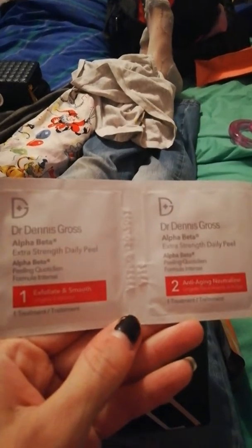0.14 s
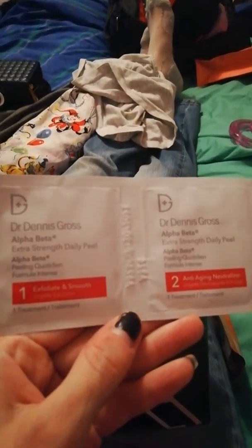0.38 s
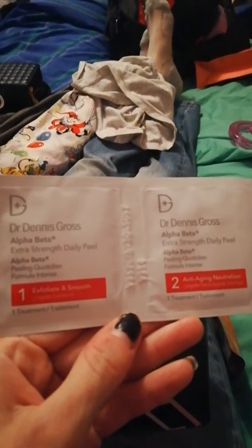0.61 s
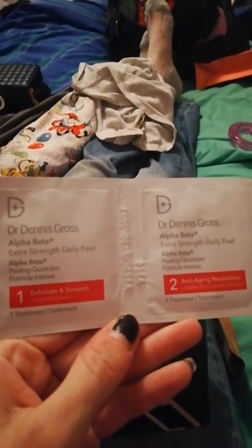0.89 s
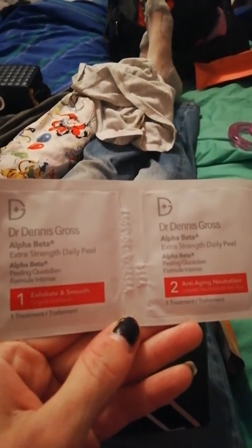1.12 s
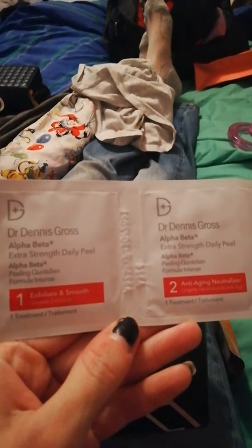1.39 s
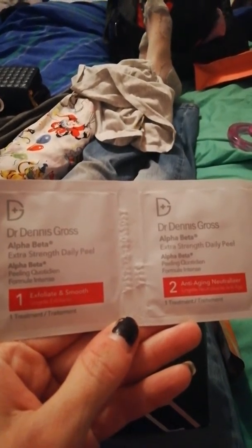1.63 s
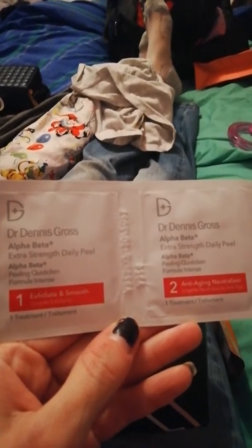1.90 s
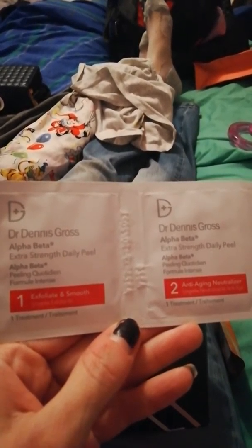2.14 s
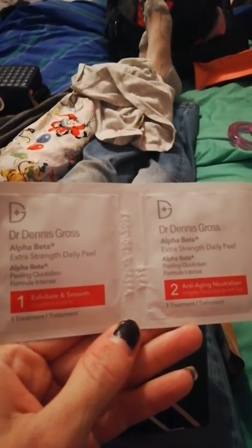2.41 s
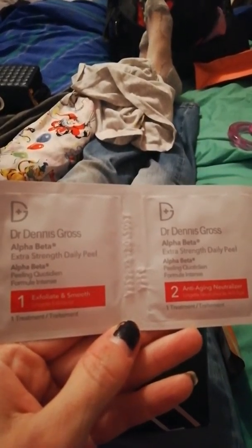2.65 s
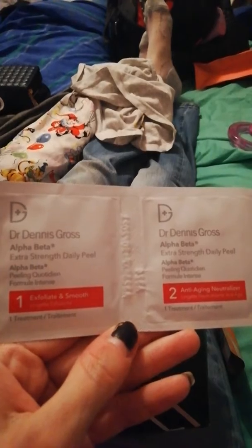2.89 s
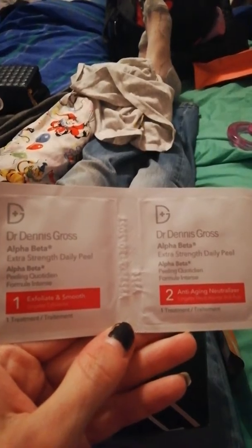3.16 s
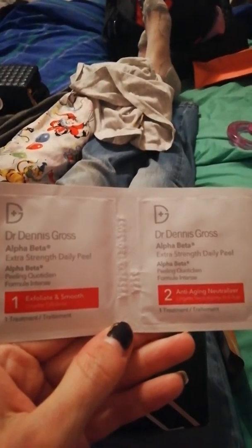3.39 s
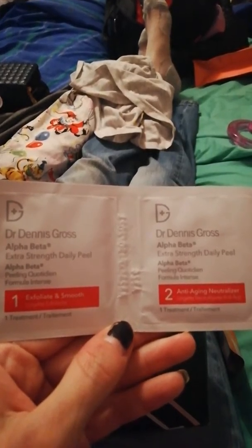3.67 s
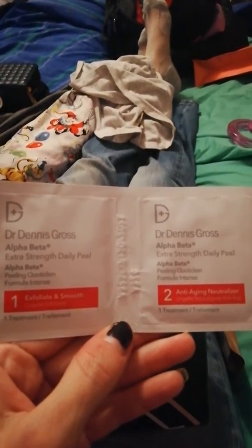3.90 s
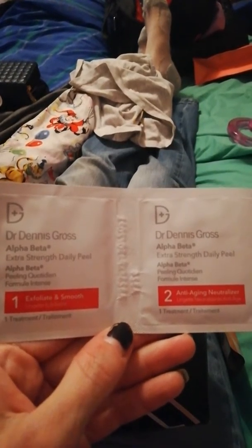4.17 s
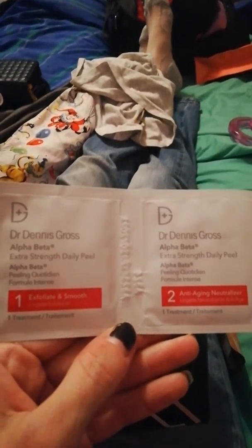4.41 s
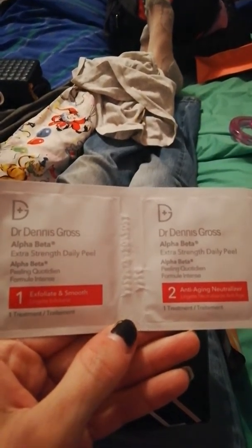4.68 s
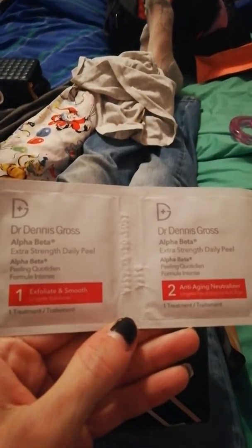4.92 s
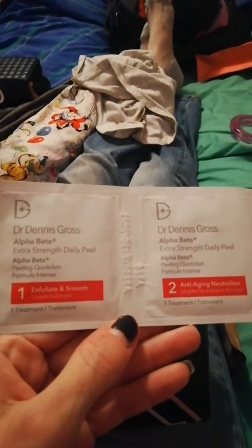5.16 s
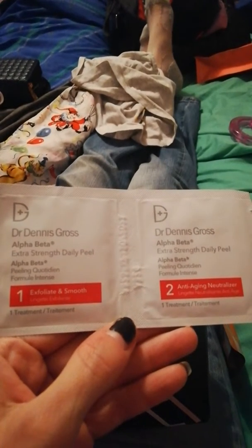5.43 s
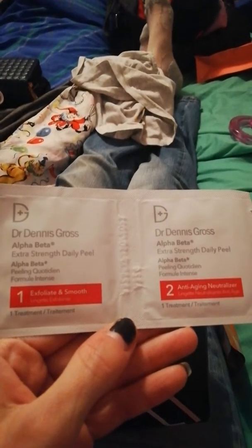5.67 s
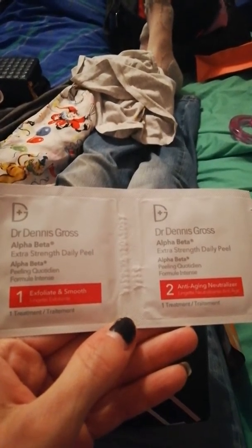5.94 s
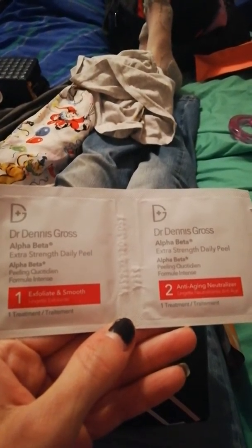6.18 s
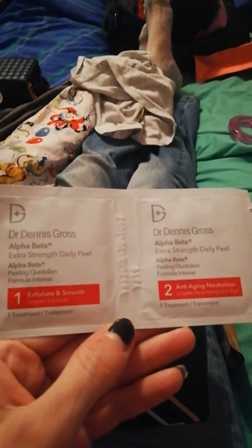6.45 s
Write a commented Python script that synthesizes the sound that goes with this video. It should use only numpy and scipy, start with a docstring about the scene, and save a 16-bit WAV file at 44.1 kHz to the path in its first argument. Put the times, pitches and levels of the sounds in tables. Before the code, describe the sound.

A small foil-laminate sachet is flexed between finger and thumb, very close to a phone microphone in a soft, quiet bedroom. A dense crumple with rapid snaps opens it, then scattered crisp crackles and faint rustles, a sharp pop near 1.4 seconds, more around 3, a long quiet gap, and last snaps just after 5 seconds.

```python
"""In a soft, quiet bedroom, a foil sachet is flexed between finger and thumb, a hand's width from a phone.
Creases snap: a noise crack, damped panel and pouch modes, and a faint settling of the film.
Fingers slide and crumple the film in bouts of grainy, resonated noise, and a short diffuse tail follows.
Soft grip swells and steady coloured room noise lie below. Two sound inlets hear it with a lag
and their own resonances."""
import sys
import numpy as np
from scipy import signal
from scipy.fft import rfft, irfft
from scipy.io import wavfile
from scipy.ndimage import uniform_filter1d

SR = 44100
rng = np.random.default_rng(int(sys.argv[2]) if len(sys.argv) > 2 else 0)


def attenuation_scalar(level_db):
    """Turn a level in dB into a linear amplitude multiplier (20 dB per decade)."""
    decades = np.asarray(level_db, float) / 20
    return 10 ** decades


def wav_out(sig):
    """Save sig, one row per channel (or a flat mono array), as 16-bit PCM at SR to the path in sys.argv[1]."""
    wavfile.write(sys.argv[1], SR, np.round(np.clip(np.atleast_2d(sig).T, -1, 1) * 32767).astype(np.int16))


N = 289359  # length [samples]
PORT_LAG = 27  # travel from the left inlet to the right one [samples]


def band(x, hz, width):
    """Two-pole resonance, gain 1 at the centre."""
    return signal.lfilter(*signal.iirpeak(min(hz, 0.45 * SR), hz / width, fs=SR), x)


def level(x, db):
    """Scale to an rms level, taken over both ports together."""
    return x * attenuation_scalar(db) / np.sqrt(np.mean(x ** 2))


def peak(x, db):
    """Scale a burst so that the top of its envelope lies at db in each port."""
    envelope_power = 2 * uniform_filter1d(x ** 2, size=50)
    return x * attenuation_scalar(db) / np.sqrt(envelope_power.max(axis=1, keepdims=True))


def walk(rate):
    """Random levels held 1 / rate s and slewed twice; spread near 1."""
    hold = int(SR / rate)
    steps = np.repeat(rng.standard_normal(N // hold + 1), hold)
    return 1.3 * uniform_filter1d(uniform_filter1d(steps, hold), hold)[:N]


def ring(modes, t, chance, rise_s, scatter_db, detune):
    """Damped modes after a short push; every blow and each port get other strengths and phases."""
    hz, db, t60 = modes.T[:, :, None]
    hz = np.minimum(hz * (1 + detune * chance[0, 0]), 0.4 * SR)
    gain = attenuation_scalar(db + scatter_db * (chance[0, 1] + chance[:, 2]) / 2)
    phase = chance[0, 3] + chance[:, 4] * np.minimum(hz / 1500, 2)  # low modes move both ports alike
    decay = np.exp(-np.log(1000) * t / t60)
    waves = gain * decay * np.sin(2 * np.pi * hz * t + phase)
    push = 1 - np.exp(-(t / rise_s) ** 2)
    return waves.sum(axis=1) * push


# creases that snap:
# (time [s], panel pitch [Hz], panel level [dB], pouch level [dB], crack level [dB])
CREASES = [(0.1355, 2580, -38.5, -35, -33), (0.1464, 3480, -26, -27.5, -23.5),
           (0.1526, 3150, -34, -27.5, -47), (0.1598, 2990, -13.5, -25.5, -24.5),
           (0.1833, 880, -37, -32, -49), (0.194, 890, -55, -36, -47), (0.427, 1810, -57, -43, -49),
           (0.4773, 2775, -16.5, -33, -27.5), (0.5681, 3630, -43.5, -48, -47),
           (0.6362, 2780, -23.5, -37.5, -57), (0.648, 1060, -49, -46, -61), (0.6729, 885, -35, -35, -59),
           (0.6769, 1290, -39, -44, -62), (0.703, 1090, -49, -37, -55), (0.8157, 3160, -36, -59, -42),
           (0.8196, 900, -52, -33.5, -42), (0.86, 3500, -22, -45, -27.5), (0.864, 940, -26, -33, -33),
           (0.984, 2830, -31.5, -35, -28), (0.9874, 970, -54, -36, -36), (1.0078, 980, -29, -25.5, -55),
           (1.0288, 1010, -45, -45, -61), (1.0995, 1010, -27, -32.5, -58), (1.151, 840, -47, -38.5, -70),
           (1.3043, 2460, -50, -43.5, -38), (1.3365, 2940, -47.5, -50, -51), (1.344, 3270, -49, -58, -46),
           (1.3739, 2410, -45, -55, -43), (1.3941, 2200, -26, -57, -45), (1.3942, 2300, -22, -24.5, -51),
           (1.4314, 2830, -10, -40, -15), (1.4402, 2990, -55.5, -47.5, -36), (1.4744, 915, -26, -31.5, -39),
           (1.5078, 890, -62, -42.5, -64), (1.5636, 840, -27.5, -41, -64),
           (1.6205, 1140, -31.5, -31.5, -50), (1.7641, 2210, -41.5, -49, -40),
           (1.9309, 3060, -42, -55, -50), (2.8037, 3970, -49, -50, -54), (2.9187, 1020, -14, -42, -26.5),
           (2.9235, 3070, -17, -24.5, -33.5), (2.9888, 1190, -25.5, -27, -48),
           (2.9934, 1220, -25, -34.5, -54), (3.065, 1100, -36, -35.5, -46),
           (3.177, 2160, -15, -29.5, -20.5), (3.187, 2260, -40, -41.5, -36), (3.7769, 4030, -54, -61, -49),
           (3.8243, 2364, -53.5, -69, -59), (4.7572, 940, -35, -44, -63), (4.7767, 1100, -48, -51, -61),
           (4.8256, 3900, -33, -42, -32.5), (4.847, 1060, -39.5, -45.5, -56),
           (4.8827, 1800, -48, -32.5, -60), (4.8875, 1270, -43.5, -49, -53), (4.9478, 3620, -46, -57, -46),
           (4.9778, 880, -65, -47.5, -69), (5.2141, 920, -35, -52, -51), (5.2194, 1170, -19, -33.5, -27),
           (5.2306, 890, -33, -60, -44), (5.283, 3300, -11, -27, -13), (5.294, 3300, -45, -50, -42.5)]
# modes of the panel beside the crease: (multiple of its pitch [ratio], level [dB], t60 [s])
PANEL_MODES = [(.45, -17, 0.013), (.72, 1, 0.0045), (1.002, 0, 0.0079), (1.28, -1, 0.0051),
               (1.6, -4.0, 0.0028), (2.1, -6.5, 0.0064), (2.8, -5, 0.0052), (3.7, -9.5, 0.0074)]
# modes of the air-filled pouch, before detuning: (pitch [Hz], level [dB], t60 [s])
POUCH_MODES = [(196, -14, 0.031), (267, -17.5, .04), (340, -5, 0.024), (451.2, -5, 0.03),
               (561.4, -0.5, 0.024), (720, 0.5, 0.015), (861, -2.5, 0.028), (1149, -6, 0.022)]
# where along the sachet the creases flip: (time [s], left minus right [dB])
CREASE_PAN = [(0.15, -3), (0.5, 0), (0.86, 1.5), (1.05, 4), (1.39, 0.5), (1.43, 4.5), (1.48, -0.5),
              (2.9, 5.5), (3.0, 4.5), (3.18, 6.5), (4.76, 8), (4.83, 4.5), (5.21, 3), (5.28, -4.5)]


def snaps():
    """Each crease flips: a broad crack, the panel rings briefly, the pouch thuds longer."""
    out, t = np.zeros((2, N + 4096)), np.arange(2600) / SR
    chances = rng.standard_normal((len(CREASES), 2, 2, 5, len(PANEL_MODES), 1))
    noises = rng.standard_normal((len(CREASES), 2, 2600))
    damped = signal.butter(4, 4600, fs=SR, output="sos")  # the laminate swallows the panel's higher modes
    for (s, hz, panel_db, pouch_db, crack_db), chance, noise in zip(CREASES, chances, noises):
        panel = ring(np.array(PANEL_MODES) * [hz, 1, 1], t, chance[0],
                     rise_s=0.00028, scatter_db=1.0, detune=0.054)
        panel = signal.sosfilt(damped, panel)
        pouch = ring(np.array(POUCH_MODES), t, chance[1], rise_s=0.001, scatter_db=2.0, detune=0.087)

        # the higher the panel's pitch, the brighter its crack
        bright = signal.butter(3, [4200, 8500 + hz], "band", fs=SR, output="sos")
        click = t / 0.0005 * np.exp(-t / 0.00037)
        crackle = 0.02 * np.exp(-t / 0.0026)
        crack = signal.sosfilt(bright, noise * (click + crackle))

        # the film settles for some hundredths of a second, trembling around the panel's pitch
        settle_shape = np.exp(-t / 0.018) * (1 - np.exp(-(t / 0.0013) ** 2))
        settle = band(noise[:, ::-1], hz, 2.8 * hz) * settle_shape

        blow = peak(panel, panel_db) + peak(settle, panel_db - 28)
        blow = blow + peak(pouch, pouch_db) + peak(crack, crack_db)
        pan_db = np.interp(s, *np.transpose(CREASE_PAN))
        for port, sign in enumerate((1, -1)):
            start = int(s * SR) + PORT_LAG * port  # the right port is the far one
            out[port, start:start + len(t)] += blow[port] * attenuation_scalar(sign * pan_db / 2)
    # so small a pouch radiates no bass
    return signal.sosfilt(signal.butter(2, 170, "high", fs=SR, output="sos"), out[:, :N])


# finger strokes over the film:
# (start [s], hold [s], slide hiss level [dB], film rustle level [dB], pouch crumple level [dB])
FINGER_STROKES = [(-0.03, 0.018, -56, -48.5, -38), (0.026, 0.016, -50, -44, -43.5),
                  (0.056, 0.029, -54, -47, -42.5), (0.123, 0.044, -48.5, -46, -42),
                  (0.2, 0.028, -58.5, -67, -59.5), (0.426, 0.046, -52.5, -61, -69.5),
                  (0.487, 0.069, -61.5, -65, -68), (0.573, 0.14, -61.5, -66, -68.5),
                  (0.781, 0.066, -54, -54.5, -57), (0.986, 0.0064, -55.5, -50, -50),
                  (1.002, 0.022, -65.5, -65, -60.5), (1.077, 0.046, -63, -66, -66),
                  (1.145, 0.079, -58, -63.5, -67.5), (1.373, 0.094, -55, -55, -62),
                  (1.504, 0.097, -54, -66.5, -72), (1.625, 0.065, -58, -54, -57),
                  (1.717, 0.036, -54, -54, -56), (1.801, 0.13, -70.5, -68, -79.5),
                  (2.137, 0.011, -68, -71.5, -81.5), (2.704, 0.11, -72, -66.5, -87),
                  (2.78, 0.11, -53.5, -56, -71), (2.915, 0.064, -58.5, -62.5, -84.5),
                  (3.017, 0.1, -53, -58.5, -66.5), (3.126, 0.072, -56, -57.5, -65.5),
                  (4.573, 0.06, -71.5, -71, -82), (4.678, 0.1, -54, -65, -70),
                  (4.78, 0.077, -60.5, -56.5, -71), (4.912, 0.021, -56, -56, -68),
                  (5.01, 0.017, -68, -66, -74), (5.058, 0.048, -72.5, -62.5, -75),
                  (5.201, 0.03, -53, -55, -56.5), (5.233, 0.062, -57, -66, -65),
                  (5.441, 0.12, -68.5, -77.5, -81), (5.65, 0.052, -68.5, -76, -85.5),
                  (5.809, 0.015, -68, -73.5, -82)]


def strokes(layer):
    """Level in dB of one layer: every stroke swells, holds and fades; overlapping strokes add in power."""
    touch_s = 0.021  # from a stroke's start to full contact
    # swell and fade time constants, then level drift over the hold; each for hiss, rustle, crumple
    attack_s = [0.02, 0.02, 0.012][layer]
    release_s = [0.0086, 0.012, 0.014][layer]
    drift_db = [-4, -0.5, -5][layer]
    t, power = np.arange(0, N, 32) / SR, 1e-10
    for start, hold, *dbs in FINGER_STROKES:
        since = t - start - touch_s
        edges = np.exp(np.minimum(since, 0) / attack_s - np.maximum(since - hold, 0) / release_s)
        drift = drift_db * (np.clip(since / hold, 0, 1) - 0.5)
        power = power + (attenuation_scalar(dbs[layer] + drift) * edges) ** 2
    return np.interp(np.arange(N) / SR, t, 10 * np.log10(power))


def film(colour, db, grain_db, alike, pan_db):
    """Dense micro-slips of uneven size through the film's resonances, each flickering on its own."""
    slips = rng.standard_normal((2, N)) * attenuation_scalar(grain_db * rng.exponential(size=N))
    slips[1] = np.sqrt(1 - alike ** 2) * slips[1] + alike * np.roll(slips[0], PORT_LAG)
    sound = 0
    for hz, width, gain_db in colour:
        flicker_db = 2.94 * walk(22) + 2.0 * walk(130)
        resonance = band(band(slips, hz, width), hz, width)
        sound = sound + attenuation_scalar(gain_db + flicker_db) * level(resonance, 0)
    return level(sound, 0) * attenuation_scalar(db + np.array([[pan_db], [-pan_db]]) / 2)


# resonances of the sliding skin, the rustling film and the crumpling pouch:
# (centre [Hz], width of each of two passes [Hz], relative level [dB])
SLIDE_COLOUR = [(5800, 3900, -10.5), (8030, 5600, 0.5), (10280, 3500, 3), (13500, 7700, -17)]
RUSTLE_COLOUR = [(2300, 2000, -5), (3570, 1400, -3), (3300, 2200, 0.5), (5500, 2700, -5)]
CRUMPLE_COLOUR = [(130, 160, -7), (435, 900, 6), (1025, 1200, 2.5)]


def handling():
    """Skin hisses along the film, the film rustles, the pouch crumples."""
    hiss = film(SLIDE_COLOUR, strokes(0), grain_db=2.5, alike=0.067, pan_db=4.0)
    rustle = film(RUSTLE_COLOUR, strokes(1), grain_db=2.5, alike=0.05, pan_db=1.66)
    crumple = film(CRUMPLE_COLOUR, strokes(2), grain_db=3.5, alike=0.23, pan_db=1.5)
    return hiss + rustle + crumple


# decay of the soft room: (centre [Hz], relative level [dB], t60 [s])
TAIL_BANDS = [(300.6, -26.5, 0.11), (1010, -30.5, 0.06), (3278, -28, 0.16), (9500, -34, 0.08)]


def tail(x):
    """Bedding and walls return a short, diffuse decay, different at each port."""
    t = np.arange(9000) / SR
    decay = 0
    for hz, db, t60 in TAIL_BANDS:
        noise = band(rng.standard_normal((2, len(t))), hz, hz * 1.6)
        decay = decay + level(noise, db - 28) * np.exp(-np.log(1000) * t / t60)
    decay = decay * np.clip(t / 0.006 - 0.4, 0, 1)  # nothing returns in the first milliseconds
    return signal.fftconvolve(x.mean(axis=0, keepdims=True), decay, axes=1)[:, :N]


# grip shifting: (time [s], pitch [Hz], peak level [dB], half length [s])
GRIP_SHIFTS = [(0.079, 80, -47, 0.025), (.149, 132, -32.5, 0.0044), (2.7, 96, -63.0, 0.077)]


def bumps():
    """The hand shifts on the phone: soft, low swells, the same at both ports."""
    t = np.arange(N) / SR
    out = np.zeros(N)
    for s, hz, db, half_s in GRIP_SHIFTS:
        swell = np.exp(-((t - s) / half_s) ** 2)
        out += attenuation_scalar(db) * swell * np.sin(2 * np.pi * hz * (t - s))
    return out


# colour of hum and hiss: (frequency [Hz], relative density [dB per Hz])
ROOM_COLOUR = [(20, -1.5), (45, -3.5), (105, -3), (143, -8), (305, -12.5), (520, -14), (862, -14),
               (1650, -15.5), (3050, -16.5), (6000, -20.5), (9650, -22), (12100, -22), (15100, -26.5),
               (16500, -38)]
# power share of the room sound common to both ports: (frequency [Hz], share [0-1])
ROOM_SHARED = [(60, 1), (130, .85), (300, .75), (700, 0.8), (1400, 0.06), (3000, 0.2), (6000, 0.1)]


def room():
    """Hum and hiss as coloured noise, gently drifting; the shared part reaches the left port last."""
    room_db, lag_s = -65, 0.00075  # rms level before the drift; lag of the left port
    hz = np.maximum(np.arange(N // 2 + 1) * SR / N, 1)

    def curve(table):
        """Read a table along a logarithmic frequency axis."""
        points_hz, values = np.transpose(table)
        return np.interp(np.log(hz), np.log(points_hz), values)

    alike = np.clip(curve(ROOM_SHARED), 0, 1)
    common, left, right = rfft(rng.standard_normal((3, N)))
    late = np.exp(-2j * np.pi * hz * lag_s)
    shared = common * np.array([late, np.ones_like(late)])
    ports = np.sqrt(alike) * shared + np.sqrt(1 - alike) * np.array([left, right])
    noise = irfft(ports * attenuation_scalar(curve(ROOM_COLOUR)), N)
    return level(noise, room_db) * attenuation_scalar(0.5 * walk(1.8))


def scene():
    """The sachet, its tail, the holding hand and the room."""
    sachet = snaps() + handling()
    return sachet + tail(sachet) + bumps() + room()


def band_limit(x):
    """A steep low-pass at the top of the band."""
    return signal.sosfilt(signal.butter(12, 16610, fs=SR, output="sos"), x)


# sound inlets, left then right: (resonance [Hz], width [Hz], added gain [ratio])
INLETS = [(9400, 3800, 0.25), (11000, 530, 0.59)]


def record(dry):
    """Each inlet lifts its own treble band; the phone cuts the top above 15.9 kHz."""
    heard = np.array([x + gain * band(x, hz, width) for x, (hz, width, gain) in zip(dry, INLETS)])
    top_cut = signal.ellip(8, 0.2, 70, 15900, fs=SR, output="sos")
    mix = signal.sosfilt(top_cut, heard)
    return band_limit(mix)


dry = scene()
out = record(dry)
wav_out(out)
```